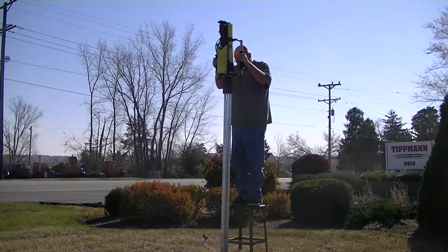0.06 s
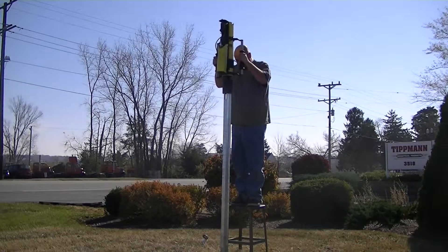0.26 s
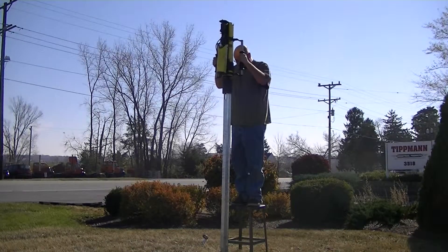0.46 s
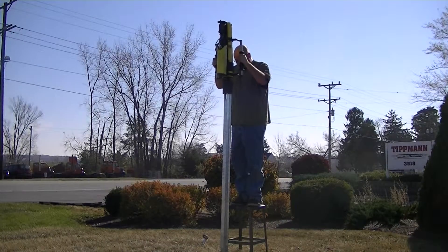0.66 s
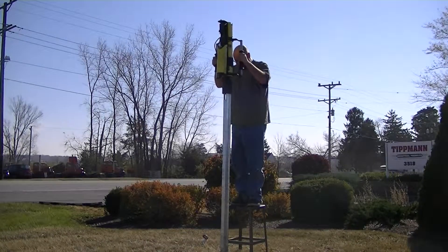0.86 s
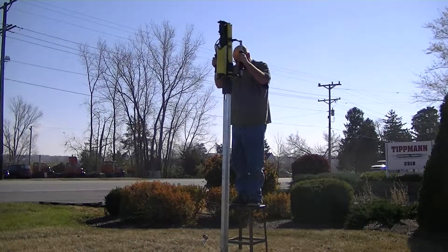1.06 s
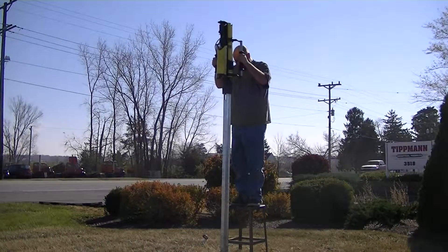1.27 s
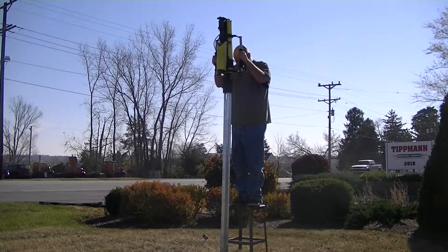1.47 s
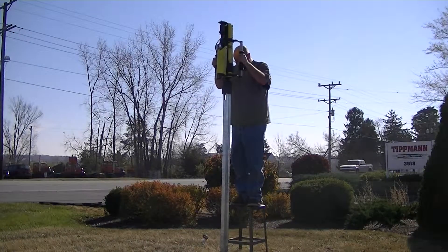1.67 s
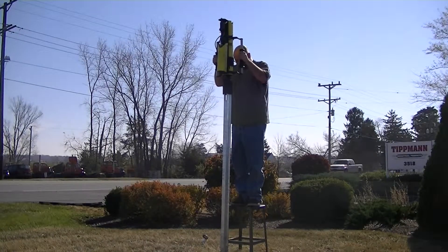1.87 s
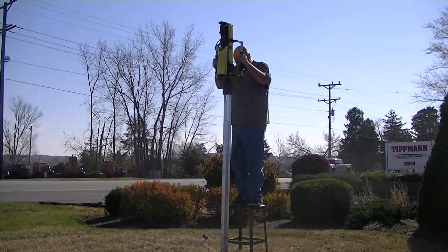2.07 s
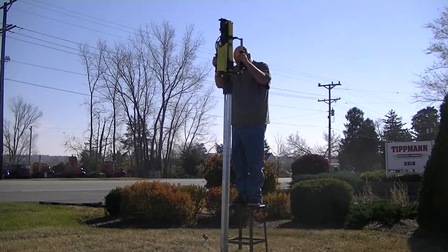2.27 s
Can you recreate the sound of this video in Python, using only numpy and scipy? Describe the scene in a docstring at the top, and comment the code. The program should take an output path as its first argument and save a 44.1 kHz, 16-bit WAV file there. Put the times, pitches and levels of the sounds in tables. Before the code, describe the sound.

An air-powered post driver hammers a steel post, sharp ringing metal blows about three a second

```python
"""On a lawn, close to the stereo microphones, an air-powered driver hammers a steel post, about three
strokes a second, while a road murmurs far off as shaped noise. In each stroke air hisses in (patchy noise),
the exhaust pops (short cavity tones and a puff), the hammer strikes and the post rings (beating sines, many
weak modes and a noise crash); the piston clacks back and settles with a soft thud, and the valve knocks shut
(noise bursts). The housing rattles on the post between blows; a thin echo of the yard trails the driver."""
import sys
import numpy as np
from scipy import signal
from scipy.fft import rfft, irfft, next_fast_len
from scipy.io import wavfile
from scipy.ndimage import uniform_filter1d, minimum_filter1d, map_coordinates

SR = 44100
rng = np.random.default_rng(int(sys.argv[2]) if len(sys.argv) > 2 else 0)


def to_wav(s):
    """Save 16-bit WAV."""
    ch = np.atleast_2d(s).T  # columns
    pcm = np.round(np.clip(ch, -1, 1) * 32767)  # PCM
    wavfile.write(sys.argv[1], SR, pcm.astype(np.int16))


N = 101430
T = np.arange(SR * 3 // 4) / SR  # time within one struck sound, s
TOP_HZ = 15780  # the microphones hear nothing much above this

# strokes of the driver: exhaust pop [t/s], cavity pitch [ratio], strike [level/dB], clack [level/dB],
# clack after the pop [t/s], length of the air flow [t/s]
STROKE_TABLE = [(-.134, 1, -1.5, 5.5, .076, .24), (0.2165, 0.99, -0.5, -0.5, 0.077, .224),
                (0.5355, 1.055, 2, 1.5, 0.073, 0.24), (0.8042, 1.01, 1, 0.5, 0.076, 0.25),
                (1.1795, 0.95, -0.5, 0, .079, 0.22), (1.4947, 0.994, -1, -0.5, .0755, 0.247),
                (1.8149, 1.05, 1.5, 0, 0.072, 0.26), (2.306, 1, 4, -2, .076, .24)]
# likeness of left and right for the metal sounds and the puff: [f/Hz], [correlation]
METAL_LIKENESS = [(300, 0.96), (2000, 0.94), (14000, 0.89)]
# likeness of left and right for the air hiss and the thuds: [f/Hz], [correlation]
AIR_LIKENESS = [(200, 0.41), (750, 0.24), (2200, 0.45), (6000, 0.37), (9000, 0.98), (15000, 0.73)]

STRIKE_DELAY_S, STRIKE_RISE_S = 0.0072, 0.00015  # strike after the pop
MODE_SCATTER_DB, MODE_SPREAD_RAD = 0.5, 0.21  # random strength, and phase turned opposite ways at the ears


def amp(db):
    """Decibels to gain."""
    return 10 ** (np.asarray(db) / 20)


def unit(x):
    """Scale to rms 1."""
    return x / np.sqrt(np.mean(x ** 2) + 1e-20)


def along(points, hz):
    """Read a curve of (Hz, value) points on a log frequency axis."""
    f, v = np.transpose(points)
    return np.interp(np.log(hz + 1), np.log(f + 1), v)


def filtered(x, response):
    """Multiply the spectrum of x by a response of frequency."""
    n = x.shape[-1]
    padded = next_fast_len(n + 4096)
    hz = np.fft.rfftfreq(padded, 1 / SR)
    return irfft(rfft(x, padded) * response(hz), padded)[..., :n]


def noise(spectrum, likeness, size=len(T)):
    """Coloured stereo noise of rms 1; the share of mid and side sets how alike the ears are."""
    def mid_side_response(hz):
        turn = np.arccos(np.clip(along(likeness, hz), -1, 1)) / 2
        return amp(along(spectrum, hz)) * np.array([np.cos(turn), np.sin(turn)])

    mid, side = filtered(rng.standard_normal((2, size)), mid_side_response)
    return unit(np.array([mid + side, mid - side]))


def wobble(rate, size):
    """A smooth random curve, rate knots a second."""
    knots = rng.standard_normal(512)
    return map_coordinates(knots, [np.arange(size) * rate / SR], mode="wrap")


def fade(rise_s, t60):
    """Quick rise and exponential decay by 60 dB in t60 seconds."""
    return (1 - np.exp(-T / rise_s)) * np.exp(-np.log(1000) * T / t60)


def add(out, s, sound):
    """Mix a sound in at time s, keeping only what falls inside the scene."""
    start = round(s * SR)
    a, b = max(start, 0), min(start + sound.shape[-1], N)
    if b > a:
        out[:, a:b] += sound[..., a - start:b - start]


def sideways(x):
    """Place sounds between the ears: the deepest bass leans left, the rest right, most near 200 Hz."""
    # balance across the stereo pair: [f/Hz], left minus right [level/dB]
    balance = [(60, 19.5), (200, -20), (400, -11), (750, -8.5), (1300, -5), (2400, -2.5), (3800, -6),
               (6500, -3.5), (8200, -0.5), (15000, -2.5)]
    half_each = np.array([[.5], [-.5]])
    return filtered(x, lambda hz: amp(along(balance, hz) * half_each))


def road():
    """Distant traffic blends into steady noise whose level swells gently."""
    # spectrum of the far road: [f/Hz], [level/dB per Hz]
    road_spectrum = [(25, -59), (70, -21), (130, 0), (200, -2.5), (300, -10), (450, 0), (1000, -1.5),
                     (2000, 0), (3500, -7.5), (5000, -16), (10000, -27.5), (16000, -34)]
    # likeness of left and right: [f/Hz], [correlation]
    road_likeness = [(100, 1), (500, 0.81), (1500, 0.0042), (5000, 0)]
    level_db, swell_db = -43.5, 1.5
    swelling = amp(level_db + swell_db * wobble(rate=7.32, size=N))
    return swelling * noise(road_spectrum, road_likeness, size=N)


def patchy(x):
    """Turbulence: narrow bands of the hiss swell and sink on their own."""
    patchy_db = 2.5
    bands = signal.stft(x, nperseg=512)[2]
    field = rng.standard_normal(bands.shape[1:])
    field = uniform_filter1d(field, size=4, axis=0)  # smooth over frequency
    field = uniform_filter1d(field, size=12, axis=1)  # smooth over time
    swollen = bands * amp(patchy_db * unit(field))
    return unit(signal.istft(swollen, nperseg=512)[1][:, :N])


def air():
    """The valve opens just before each pop; the hiss sags with the pressure until the valve shuts."""
    # spectrum of the air hiss: [f/Hz], [level/dB per Hz]
    air_spectrum = [(100, -47), (400, -1.5), (800, -4), (2000, 1.5), (4500, -4.5), (6600, -4.5),
                    (7500, -10.5), (9700, 3.5), (12000, -4.5), (14000, -12.5), (15600, -8)]
    level_db, flutter_db, lead_s = -28.5, .8, .006
    open_db_per_s, sag_db_per_s, shut_db_per_s = 1202.5, 22, 600  # shutting adds to the sag
    flow = np.zeros(N)
    for s, *_, length_s in STROKE_TABLE:
        t = np.arange(N) / SR - s
        opening_db = -open_db_per_s * np.maximum(-t - lead_s, 0)
        sag_db = -sag_db_per_s * np.maximum(t, 0)
        shutting_db = -shut_db_per_s * np.maximum(t - length_s, 0)
        flow += amp(opening_db + sag_db + shutting_db)
    flutter = amp(level_db + flutter_db * wobble(rate=150, size=N))
    return flow * flutter * patchy(noise(air_spectrum, AIR_LIKENESS, size=N))


def exhaust():
    """A slug of air pops out of the exhaust cavity, right of centre, with a short puff."""
    # tones of the exhaust cavity: [f/Hz] before the stroke's pitch ratio, [level/dB], 60 dB decay [t/s]
    cavity = [(170, -5, .02), (450, -.5, .021), (790, -.5, .013)]
    # spectrum of the puff: [f/Hz], [level/dB per Hz]
    puff_spectrum = [(150, -47), (700, 17), (1500, -15), (3000, 4.5), (5000, -6), (7500, -2.5),
                     (10000, -1.5), (12500, 2.5), (16000, -30)]
    pop_db, pop_rise_s, pop_low_hz, pan_db = 0.5, .0005, 115, -6.5  # pan: left minus right
    puff_db, puff_rise_s, puff_t60 = -6, 0.00038, 0.019
    low_cut = signal.butter(4, pop_low_hz, "highpass", fs=SR, output="sos")
    out = np.zeros((2, N))
    for s, ratio, *_ in STROKE_TABLE:
        pop = np.zeros(len(T))
        for hz, level_db, t60 in cavity:
            tone = np.cos(2 * np.pi * hz * ratio * T)
            pop -= amp(pop_db + level_db) * fade(pop_rise_s, t60) * tone
        pop = signal.sosfilt(low_cut, pop)
        pop = pop * amp(pan_db * np.array([[.5], [-.5]]))
        puff = amp(puff_db) * fade(puff_rise_s, puff_t60) * noise(puff_spectrum, METAL_LIKENESS)
        add(out, s, pop + puff)
    return out


def main_ring():
    """The post's strong modes; the tube is not quite round, so each beats with a close twin."""
    # strong modes of the steel post: [f/Hz], [level/dB]
    post_modes = [(980, -30), (1204, -35), (1660, -30), (2002, -34), (4323, -32), (5889, -40), (6245, -33),
                  (6560, -30), (9157, -27), (9650, -29), (9808, -26), (10610, -26), (11601, -36),
                  (12062, -29.5)]
    level_db, t60, lowest_t60 = -1, 0.42, 1  # the lowest mode rings longest
    twin_db, most_beat_hz = -4, 12
    ring = np.zeros((2, len(T)))
    for k, (hz, db) in enumerate(post_modes):
        strength, detune, spread = rng.standard_normal(3)
        phase, twin_phase = 2 * np.pi * rng.uniform(size=2)
        ear_phase = MODE_SPREAD_RAD * spread * np.array([[1], [-1]])
        turn = 2 * np.pi * hz * T + phase + ear_phase
        beat_turn = 2 * np.pi * most_beat_hz * np.tanh(detune) * T
        pair = np.sin(turn) + amp(twin_db) * np.sin(turn + beat_turn + twin_phase)
        decay = fade(STRIKE_RISE_S, t60 if k else lowest_t60)
        ring += amp(level_db + db + MODE_SCATTER_DB * strength) * decay * pair
    return ring


def wall_ring(places, own_db, count):
    """The tube wall's many weak modes, struck with new strengths and phases."""
    # level of the wall modes over frequency: [f/Hz], [level/dB]
    wall_spectrum = [(300, -19.5), (800, -9), (1150, -5), (1900, 0), (3600, -12.5), (4500, -2), (7700, -5),
                     (9600, -0.5), (11000, -1), (12300, -9.5), (13800, -20), (15500, -11)]
    hz = np.fft.rfftfreq(count, 1 / SR)
    bins = (places * np.searchsorted(hz, TOP_HZ)).astype(int)
    strength, real, imag, spread = rng.standard_normal((4, len(bins)))
    mode_db = along(wall_spectrum, hz[bins]) + own_db + MODE_SCATTER_DB * strength
    phase = np.arctan2(imag, real) + MODE_SPREAD_RAD * np.array([spread, -spread])
    spectrum = np.zeros((2, len(hz)), complex)
    spectrum[:, bins] = amp(mode_db) * np.exp(1j * phase)
    return unit(irfft(spectrum, count)[:, :len(T)])


def post():
    """Each hammer blow crashes into the steel tube, which rings until the piston's return damps it a little."""
    # spectrum of the crash: [f/Hz], [level/dB per Hz]
    crash_spectrum = [(100, -9), (700, -3.5), (1900, -2.5), (4000, -7.5), (7500, -19.5), (9600, 8),
                      (12000, -9), (14000, -19)]
    wall_db, wall_t60, crash_db, crash_t60 = -19.5, 0.24, -14, 0.12
    choke_db, choke_s = 1, .012  # depth of the damping and the time it takes
    # the wall keeps its modes from blow to blow: spread unevenly up to TOP_HZ, each with its own level
    jitter = rng.uniform(size=230)
    places = (np.arange(len(jitter)) + jitter + 5) / (len(jitter) + 5)
    own_db = 9 * rng.uniform(-1, 1, len(places))
    out = np.zeros((2, N))
    for s, _, strike_db, _, clack_s, _ in STROKE_TABLE:
        wall = amp(wall_db) * fade(STRIKE_RISE_S, wall_t60) * wall_ring(places, own_db, count=65536)
        crash = amp(crash_db) * fade(STRIKE_RISE_S, crash_t60) * noise(crash_spectrum, METAL_LIKENESS)
        damping_db = choke_db * np.clip((T + STRIKE_DELAY_S - clack_s) / choke_s, 0, 1)
        blow = amp(strike_db - damping_db) * (main_ring() + wall + crash)
        add(out, s + STRIKE_DELAY_S, blow)
    return out


def piston():
    """The piston touches and clacks against its stop and settles with a thud; the valve knocks shut."""
    # spectrum of the clack: [f/Hz], [level/dB per Hz]
    clack_spectrum = [(40, -42), (100, -67), (250, -27), (400, -1.5), (620, -2.5), (900, 2), (2000, 5),
                      (3500, -3), (7500, -9), (10000, -2), (16000, -22.5)]
    # spectrum of the thud and the valve's knock: [f/Hz], [level/dB per Hz]
    thud_spectrum = [(60, -67), (150, -2.5), (220, -6), (300, -28), (410, 2.5), (600, -8), (1200, -13),
                     (4000, -25)]
    clack_db, clack_rise_s, clack_t60 = -11, 0.00057, 0.043
    touch_lead_s, touch_db = 0.0052, -12  # first touch before the clack, and its level against it
    thud_delay_s, thud_db, valve_db = .144, -23.5, -34
    thud_rise_s, thud_t60 = 0.0035, 0.067
    out = np.zeros((2, N))
    for s, _, _, stroke_db, clack_s, length_s in STROKE_TABLE:
        for lead_s, contact_db in [(touch_lead_s, touch_db), (0, 0)]:
            gain = amp(clack_db + stroke_db + contact_db)
            clack = gain * fade(clack_rise_s, clack_t60) * noise(clack_spectrum, METAL_LIKENESS)
            add(out, s + clack_s - lead_s, clack)
        for delay_s, knock_db in [(thud_delay_s, thud_db), (length_s, valve_db)]:
            thud = amp(knock_db) * fade(thud_rise_s, thud_t60) * noise(thud_spectrum, AIR_LIKENESS)
            add(out, s + delay_s, thud)
    return out


def housing():
    """The loose housing chatters against the post, each rattle a burst of tiny contacts."""
    # rattles of the housing: [t/s], [level/dB], dull above [f/Hz]
    rattles = [(0.072, -25.5, 12000), (0.194, -36, 3000), (.402, -29, 9000), (.439, -34, 9000),
               (.519, -34.5, 2940), (.736, -21.5, 9500), (.991, -22, 12000), (1.026, -30.5, 9000),
               (1.152, -39, 3030), (1.294, -32.5, 6000), (1.382, -26.5, 6060), (1.474, -36.5, 2960),
               (1.626, -27.5, 9000), (1.702, -23.5, 9300), (1.931, -34.5, 4000), (1.989, -31, 6000),
               (2.029, -25, 6000), (2.173, -38, 3000), (2.247, -32.5, 3410)]
    # spectrum of a rattle before dulling: [f/Hz], [level/dB per Hz]
    rattle_spectrum = [(200, -26), (800, 2), (1600, 6), (3200, 7), (5000, 0), (7500, -4.5), (10000, 15.5),
                       (16000, -19)]
    all_db, rise_s, t60 = 2, .0004, .07
    chatter_db, chatter_per_s = 3, 477
    out = np.zeros((2, N))
    for s, db, dull_hz in rattles:
        chatter = amp(chatter_db * wobble(rate=chatter_per_s, size=len(T)))
        contacts = unit(chatter * noise(rattle_spectrum, METAL_LIKENESS))
        contacts = filtered(contacts, lambda hz: 1 / (1 + (hz / dull_hz) ** 4))
        add(out, s, amp(all_db + db) * fade(rise_s, t60) * unit(contacts))
    return out


def yard(x):
    """A thin outdoor echo: a tail of decaying noise, shortest in the treble."""
    # decay of the yard: [f/Hz], 60 dB decay [t/s]
    yard_t60 = [(200, 0.17), (2000, 0.15), (6000, 0.1), (12000, 0.05)]
    hz, t, bands = signal.stft(rng.standard_normal((2, SR // 2)), SR, nperseg=256)
    decay = np.exp(-np.log(1000) * t / along(yard_t60, hz)[:, None])
    tail = signal.istft(bands * decay, SR, nperseg=256)[1]
    return signal.fftconvolve(x, tail / np.linalg.norm(tail[0]), axes=1)[:, :N]


def scene():
    """The driver and its echo, close by, in front of the far road."""
    yard_db = -26
    murmur = sideways(road())
    driver = sideways(air() + post() + piston() + housing()) + exhaust()
    return murmur + driver + amp(yard_db) * yard(driver)


def record(dry):
    """Behind the microphones a fast limiter holds the peaks down; the deep bass and the top are cut off."""
    ceiling, limiter_s, low_cut_hz = .93, .003, 35
    size = round(limiter_s * SR)
    needed = ceiling / np.maximum(np.abs(dry), ceiling)
    gain = uniform_filter1d(minimum_filter1d(needed, size), size)

    def response(hz):
        bass_cut = hz ** 2 / np.hypot(hz ** 2, low_cut_hz ** 2)
        top_cut = np.clip((TOP_HZ - hz) / 200 + .5, 0, 1)  # a slope 200 Hz wide
        return bass_cut * top_cut

    return filtered(dry * gain, response)


dry = scene()
out = record(dry)
to_wav(out)
```